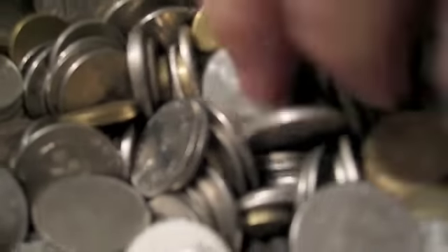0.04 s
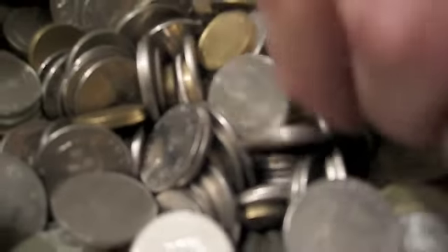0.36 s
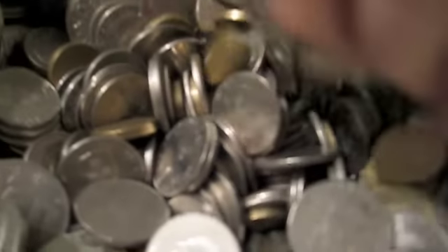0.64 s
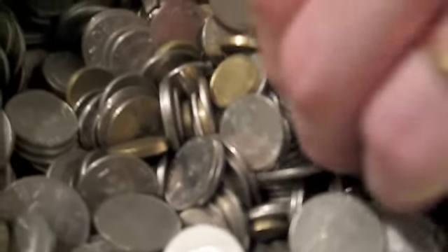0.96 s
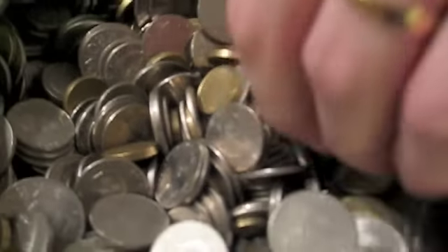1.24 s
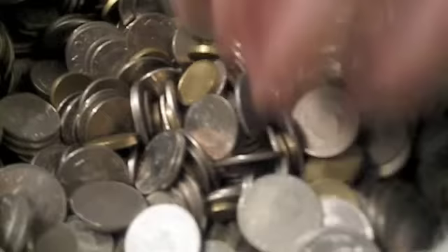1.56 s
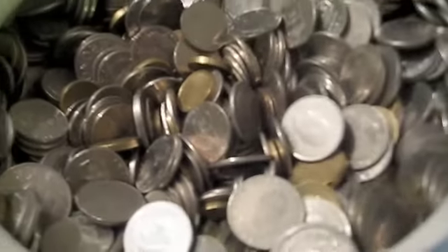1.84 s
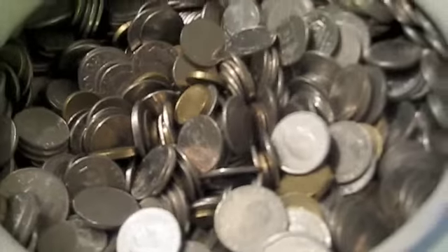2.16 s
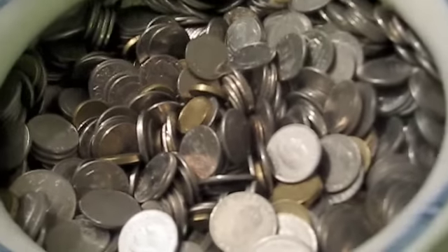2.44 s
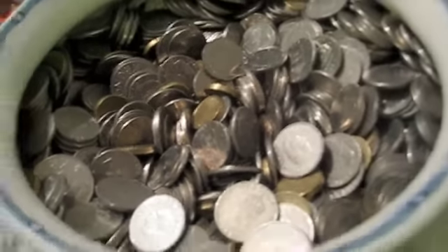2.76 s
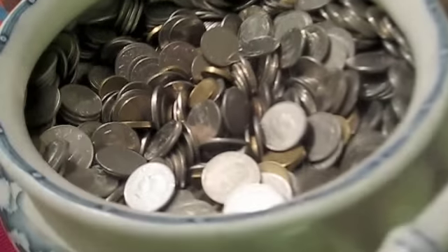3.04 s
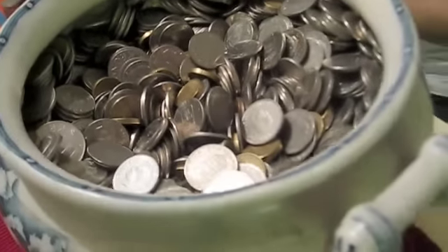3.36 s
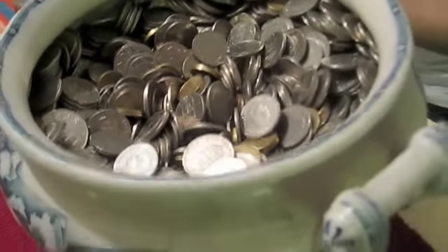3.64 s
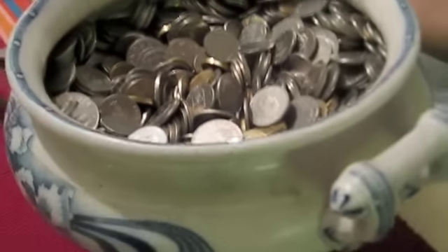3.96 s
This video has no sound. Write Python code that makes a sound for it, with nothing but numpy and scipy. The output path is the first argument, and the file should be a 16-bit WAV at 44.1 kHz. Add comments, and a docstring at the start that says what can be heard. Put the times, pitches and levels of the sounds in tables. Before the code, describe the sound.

A hand stirs a heap of coins in a ceramic pot, then a few click softly.

```python
"""A quiet room, the microphone close to a ceramic pot in which fingers stir a heap of coins.
The coins knock and slide on each other, mostly damped by the heap; now and then one comes free and
rings until it is touched. The hollow of the pot colours the rattle, and a few sharp clinks overload
the microphone with a low thump. The hand moves off with a few coins clicking in it, farther from
the microphone and with more of the room, and a fan hums on."""
import sys
import numpy as np
from scipy import signal
from scipy.fft import rfft, irfft, next_fast_len
from scipy.io import wavfile

SR = 44100
rng = np.random.default_rng(int(sys.argv[2]) if len(sys.argv) > 2 else 0)


def wrap_up_sound(samples):
    """Save the sound to the file named by the first command line argument, as 16-bit audio."""
    columns = np.atleast_2d(samples).T
    # keep every value between -1 and 1, then stretch to whole-number steps
    tamed = np.clip(columns, -1, 1)
    steps = np.round(tamed * 32767).astype(np.int16)
    wavfile.write(sys.argv[1], SR, steps)


N = 176400


def coins_in_pot():
    """Close up: the stirred heap, and the hollow of the pot answering it."""
    # coin knocks on coin: t/s, level/dB
    hits = [(0.0528, -12.5), (0.0563, -16.5), (0.0705, -11), (0.0748, -10), (0.092, -19), (0.11, -15),
            (0.1295, -38), (0.1394, -18.5), (0.1591, -13.5), (0.1656, -14.5), (0.1823, -17), (0.2245, -41),
            (0.2327, -23.5), (0.2536, -18), (0.2737, -16), (0.2788, -12), (0.2868, -13.5), (0.2908, -14),
            (0.2953, -3), (0.3038, -13.5), (0.3598, -9), (0.391, -16), (0.4204, -13.5), (0.4417, -16),
            (0.4535, -24), (0.4662, -20), (0.5055, -29), (0.5163, -27.5), (0.5379, -31), (0.5576, -19.5),
            (0.5769, -2.5), (0.6011, 1.5), (0.6062, -13), (0.6155, -11), (0.6663, -19), (0.6785, -16),
            (0.6872, 1.5), (0.6888, -14), (0.7145, -15.5), (0.7239, 1), (0.7335, -7.5), (0.7455, -15),
            (0.7657, -15), (0.7691, -25), (0.8035, -5), (0.8193, -17), (0.821, -2), (0.8284, -11),
            (0.8537, -20), (0.8675, -12), (0.8783, -17), (0.921, -14), (0.929, -18), (0.9467, -23.5),
            (0.9925, -12.5), (1.0217, -12.5), (1.0373, -28), (1.0552, -24), (1.0703, -13), (1.076, -11.5),
            (1.086, -12.5), (1.1016, -18), (1.1205, -16), (1.1612, -15.5), (1.2051, -18), (1.217, -10),
            (1.2302, -29), (1.2515, -8), (1.2565, -18), (1.2693, -14), (1.2757, -15), (1.3141, -13.5),
            (1.3463, -4), (1.3619, -8), (1.3697, -9), (1.3836, -7), (1.4295, -16.5), (1.4441, -29),
            (1.4581, -22), (1.4641, -7), (1.4677, -0.5), (1.5105, -14), (1.5395, -15.5), (1.5495, -22),
            (1.5745, -13), (1.9226, -17)]
    # coins pushed over each other: start t/s, end t/s, level/dB
    pushes = [(.056, .082, -27), (0.08, 0.133, -35), (0.137, 0.185, -34.5), (.266, .304, -27),
              (0.364, .385, -29.5), (0.395, 0.423, -26), (0.434, 0.468, -33), (0.566, 0.603, -24),
              (0.617, .635, -33), (.678, .706, -29), (0.716, 0.744, -44), (0.974, .992, -29.5),
              (1.03, 1.069, -28.5), (1.067, 1.145, -33.5), (1.159, 1.21, -29.5), (1.218, 1.257, -25.5),
              (1.272, 1.339, -31.5), (1.337, 1.437, -38.5)]
    # bright, pitched chinks: t/s, level/dB, f/Hz
    square_hits = [(.2868, -15.5, 5280), (.2953, -29, 5500), (.821, -10.5, 6100), (1.2302, -16.5, 5300)]
    # spectrum of the clinks: f/Hz, level/dB
    clink_colour = [(60, -24), (400, -15), (700, -7), (2000, -4), (3500, -0.5), (5000, 4.5), (7000, 2),
                    (9500, 2.5), (16000, -9.5)]
    # spectrum of the sliding: f/Hz, level/dB
    slide_colour = [(60, -42.5), (190, -11.5), (400, -22.5), (560, -12), (1400, -7), (2000, -9),
                    (2900, -2.5), (3700, -4), (5000, 2), (7000, -5.5), (10500, -2.5), (16000, -24)]
    # resonances of pot and heap: f/Hz, width/Hz, starting level/dB over the direct sound
    pot_modes = [(532, 130, 11.5), (587, 13, 12), (1045, 94, 4.5), (2980, 360, 1.5)]
    hollow_db_per_s = -6.5   # the pot answers less as the hand works its way out
    coins = free_rings() + chinks(square_hits)
    coins += coloured(slides(pushes, contacts_per_s=850), slide_colour)
    coins += coloured(clinks(hits) + clinks(heap_ticks()), clink_colour)
    hollow = sum(from_db(db) * resonance(coins, hz, width) for hz, width, db in pot_modes)
    return coins + from_db(hollow_db_per_s * np.arange(N) / SR) * hollow


def clinks(rows):
    """Coin strikes coin: a burst of chatter through the heap and a cluster of damped coin modes."""
    split_hz, mode_t60_s, mode_db, trim_db = 7600, 0.039, -16, -5
    middle_blow_db, treble_db_per_db, treble_spread_db = -26, 0.35, 3.5   # harder knocks are brighter
    out, t = np.zeros(N), seconds(.05)
    envelope = dying(t - 0.00052, t60=0.012)   # holds for half a millisecond
    bands = [signal.butter(3, split_hz, kind, fs=SR, output="sos") for kind in ("low", "high")]
    for s, db, *_ in rows:
        chatter = rng.standard_normal(len(t)) * envelope
        chatter *= np.sqrt(np.sum(envelope ** 2) / np.sum(chatter ** 2))
        hz = rng.uniform(4092, 15305, size=(12, 1))
        t60 = mode_t60_s * rng.uniform(0.15, 1, size=(12, 1))
        modes = (np.sin(2 * np.pi * hz * t) * dying(t, t60)).sum(axis=0)
        mids, treble = (signal.sosfilt(band, chatter + from_db(mode_db) * modes) for band in bands)
        treble_db = treble_db_per_db * (db - middle_blow_db)
        bright = from_db(treble_db - treble_spread_db * rng.standard_normal())
        clink = (mids + bright * treble) * np.sqrt(2 / (1 + bright ** 2))
        add(out, s, from_db(db + trim_db) * clink)
    return out


def slides(rows, contacts_per_s):
    """Milled rims and faces rub: each push is a run of tiny uneven contacts that set coins ringing."""
    attack_s, release_s, swell_db = 0.0034, 0.0048, 3
    contact_t60_s, contact_spread_db, mode_db = 0.0064, 3, -6
    firm_push_db = -29   # contacts_per_s holds at this level; firmer pushes crowd the contacts
    out, t = np.zeros(N), seconds(.2)
    for start, end, db in rows:
        rate = contacts_per_s * from_db(db - firm_push_db)
        sizes = from_db(contact_spread_db * np.minimum(rng.exponential(1, len(t)), 2))
        contacts = (rng.random(len(t)) < rate / SR) * sizes
        power = signal.lfilter([1], [1, -dying(1 / SR, contact_t60_s) ** 2], contacts ** 2 + 1e-18)
        rub = np.sqrt(power) * rng.standard_normal(len(t))
        modes = sum(resonance(rub, hz, width_hz=80) for hz in rng.uniform(4060, 11000, size=6))
        length = max(end - start, attack_s)
        swell = from_db(swell_db * (np.minimum(t / length, 1) - 1))   # pressure builds through the push
        push = np.minimum(t / attack_s, 1) * swell * np.exp(-np.maximum(t - length, 0) / release_s)
        add(out, start, from_db(db) * push * rms_one(rub + from_db(mode_db) * modes))
    return out


def free_rings():
    """A loose coin sings on beating modes and buzzes on its neighbours; a touch leaves a faint ring."""
    # coins coming free: t/s, f/Hz, level/dB, T60/s, time until touched/s
    freed = [(.2245, 10450, -35, .12, .035), (.392, 10250, -30, .12, .025), (.7239, 9207, -10, .04, .02),
             (.8035, 9800, -25, .07, .017), (1.037, 10850, -30, .16, .06), (1.086, 10180, -28, .35, .11),
             (1.1016, 10589, -20, .3, .09), (1.3836, 15522, -23, .25, .02), (1.4677, 9815, -24, .45, .072)]
    twin_gap_hz, twin_db = 23.9, -5.5   # a coin's modes come in close pairs
    touch_t60_s, linger_db, buzz_per_swing = .012, -17, 3.7
    out, t = np.zeros(N), seconds(.4)
    for s, hz, db, t60, free_s in freed:
        twin = from_db(twin_db) * np.sin(2 * np.pi * (hz + twin_gap_hz * rng.uniform(0.72, 1)) * t)
        touch = np.maximum(dying(t - free_s, touch_t60_s), from_db(linger_db))
        swing = from_db(db) * dying(t, t60) * touch
        buzz = buzz_per_swing * swing * rms_one(low_pass(rng.standard_normal(len(t)), hz=4500))
        add(out, s, swing * (coin_tone(t, hz) + twin) * (1 + buzz))
    return out


def chinks(rows):
    """A squarely struck coin answers with a short tone."""
    out, t = np.zeros(N), seconds(.1)
    for s, db, hz in rows:
        add(out, s, from_db(db) * coin_tone(t, hz) * dying(t, t60=0.025))
    return out


def coin_tone(t, hz):
    """A coin's main mode and, if it lies below half the sample rate, the next one up."""
    upper_hz = 1.587 * hz
    overtone = (upper_hz < SR / 2) * from_db(-15) * np.sin(2 * np.pi * upper_hz * t)
    return np.sin(2 * np.pi * hz * t) + overtone


def overload_thumps():
    """Low thumps of the microphone overloading on sharp clinks."""
    # microphone overloads: t/s, level/dB
    overloads = [(0.1665, -24.5), (0.687, -22.5), (0.7241, -10.5), (1.4676, -15), (1.9226, -36)]
    pulses, t = np.zeros(N), seconds(.02)
    for s, db in overloads:
        add(pulses, s, -from_db(db) * dying(t, t60=0.0029))
    return low_pass(pulses, hz=1500) + from_db(2) * resonance(pulses, hz=820, width_hz=840)


def heap_ticks():
    """The heap shifts in faint random ticks while the hand is in it; rows of t/s, level/dB."""
    hand_in_s, hand_out_s, ticks_per_s, tick_db, spread_db = 0.066, 1.58, 100, -32, 6
    gap_draws, level_draws = rng.random((400, 2)).T
    times = hand_in_s + np.cumsum(-np.log(1 - gap_draws)) / ticks_per_s
    levels = tick_db + spread_db * (2 * level_draws - 1)
    return [(s, db) for s, db in zip(times, levels) if s < hand_out_s]


def coins_in_hand():
    """Farther off: a few coins click and slither softly in the hand as it moves away."""
    # clicks in the hand: t/s, level/dB, f/Hz
    clicks = [(1.9439, -27, 3250), (2.1635, -25, 5560), (2.369, -26, 4400), (2.5343, -28.5, 4300),
              (2.6903, -35, 8300), (2.9697, -40, 6000)]
    # slips in the hand: start t/s, end t/s, level/dB
    slips = [(2.078, 2.1, -39), (2.12, 2.163, -38.5)]
    # spectrum of both at that distance: f/Hz, level/dB
    far_colour = [(1500, -25), (3000, -5.5), (4300, -3), (5600, 1), (6500, -2.5), (8000, -4.5),
                  (9300, -7.5), (12400, -8.5), (15000, -22)]
    rattle = clinks(clicks) + slides(slips, contacts_per_s=6800)
    return coloured(rattle, far_colour) + from_db(-6.5) * chinks(clicks)


def room(x):
    """The walls return a short, duller diffuse tail."""
    t, delay_s = seconds(.6), 0.0054
    tail = low_pass(rng.standard_normal(len(t)), hz=6900, order=1) * dying(t, t60=0.22) * (t > delay_s)
    return signal.fftconvolve(x, tail / np.sqrt(np.sum(tail ** 2)))[:N]


def fan():
    """Room tone: a fan's steady rush of air with a few narrow resonances."""
    # fan resonances: f/Hz, width/Hz, level/dB
    fan_modes = [(866.7, 56, -53.5), (1285, 25, -57.5), (1598, 64, -63.5), (8000, 150, -76)]
    # spectrum of the moving air: f/Hz, level/dB
    air_colour = [(25, -3.5), (430, 1), (700, 1), (1050, -3.5), (1600, 1.5), (2100, -6), (3000, -7),
                  (4000, -9.5), (8000, -14), (16000, -22)]
    hum = sum(from_db(db) * rms_one(resonance(rng.standard_normal(N), hz, width))
              for hz, width, db in fan_modes)
    return hum + from_db(-51.5) * coloured(rng.standard_normal(N), air_colour)


def from_db(db):
    """Decibels to gain."""
    return 10 ** (np.asarray(db) / 20)


def rms_one(x):
    """Scale to unit rms."""
    return x / np.sqrt(np.mean(x ** 2) + 1e-20)


def seconds(length):
    """Time axis of the given length."""
    return np.arange(int(length * SR)) / SR


def dying(t, t60):
    """1 before time zero, then a decay of 60 dB every t60 seconds."""
    return np.exp(-np.log(1000) * np.maximum(t, 0) / t60)


def add(out, s, sound):
    """Mix a sound in at time s."""
    i = max(int(s * SR), 0)
    out[i:i + len(sound)] += sound[:N - i]


def coloured(x, points):
    """Causal (minimum-phase) filter that follows a spectrum and keeps the power of white noise."""
    size = next_fast_len(N + SR // 2) // 2 * 2
    hz, db = np.transpose(points)
    bin_hz = np.fft.rfftfreq(size, 1 / SR)
    gain = rms_one(from_db(np.interp(np.log(bin_hz + 1), np.log(hz), db)))
    cepstrum = irfft(np.log(gain))
    cepstrum[1:size // 2] *= 2
    cepstrum[size // 2 + 1:] = 0
    return irfft(rfft(x, size) * np.exp(rfft(cepstrum)))[:N]


def low_pass(x, hz, order=2):
    """Butterworth low-pass."""
    return signal.sosfilt(signal.butter(order, hz, fs=SR, output="sos"), x + 1e-18)


def resonance(x, hz, width_hz):
    """Two-pole resonance with gain 1 at its peak."""
    r = np.exp(-np.pi * width_hz / SR)
    feedback = [1, -2 * r * np.cos(2 * np.pi * hz / SR), r * r]
    return signal.lfilter(np.array([1, 0, -1]) * (1 - r * r) / 2, feedback, x + 1e-18)


def scene():
    """One microphone: the pot close by, the hand farther off with more of the room, the fan behind."""
    hum = fan()
    far = coins_in_hand()
    near = coins_in_pot() + overload_thumps()
    walls = room(from_db(-20) * near + from_db(-9) * far)
    return (near + far + walls + hum)[None]


def record(dry):
    """A quick limiter ducks after the hardest knocks, peaks are rounded, and the top is cut steeply."""
    limit_db, attack_s, recovery_db_per_s = -12, 0.00025, 65
    ceiling, cutoff_hz = 0.81, 15850
    pole = np.exp(-1 / (attack_s * SR))
    power = signal.lfilter([1 - pole], [1, -pole], dry ** 2)
    over_db = np.maximum(10 * np.log10(power + 1e-12) - limit_db, 0)
    recovery_db = recovery_db_per_s * np.arange(N) / SR
    duck_db = np.maximum.accumulate(over_db + recovery_db, axis=1) - recovery_db
    rounded = ceiling * np.tanh(dry * from_db(-duck_db) / ceiling)
    return signal.sosfilt(signal.ellip(10, .1, 80, cutoff_hz, fs=SR, output="sos"), rounded)


dry = scene()
out = record(dry)
wrap_up_sound(out)
```